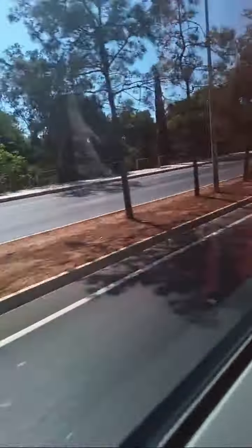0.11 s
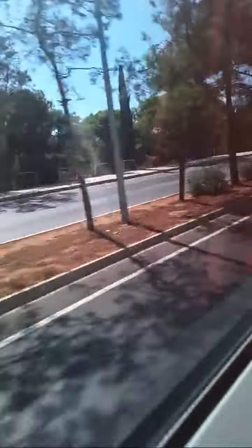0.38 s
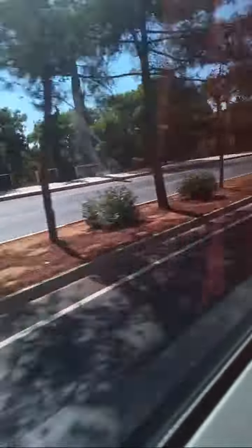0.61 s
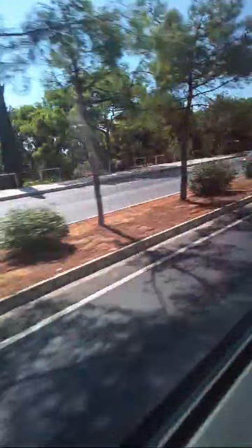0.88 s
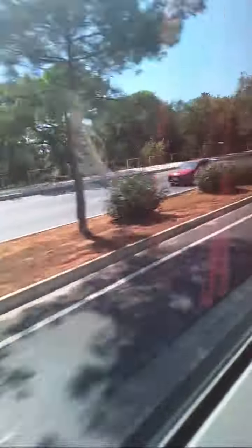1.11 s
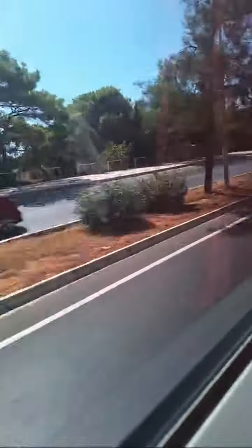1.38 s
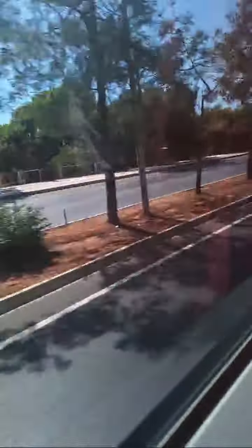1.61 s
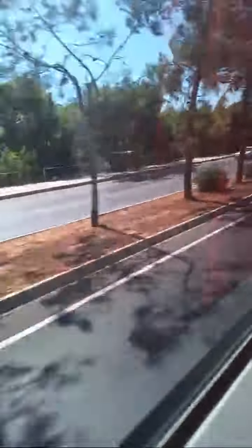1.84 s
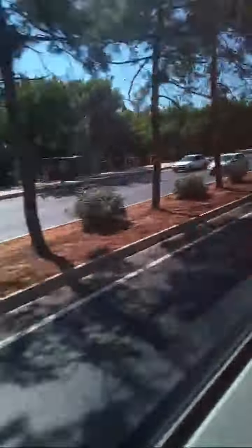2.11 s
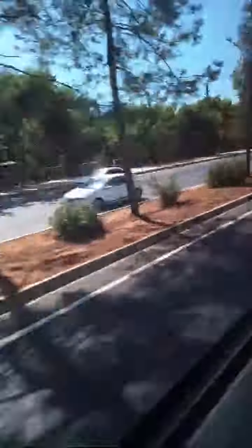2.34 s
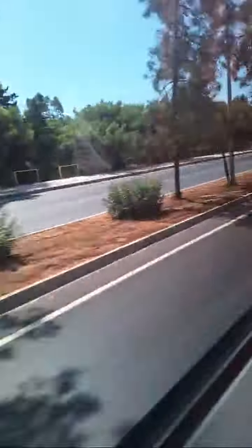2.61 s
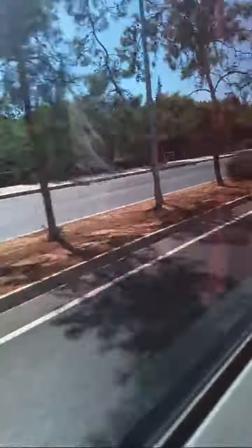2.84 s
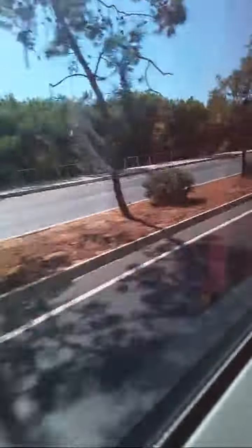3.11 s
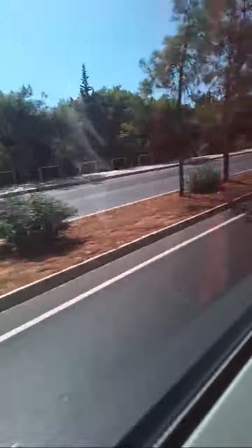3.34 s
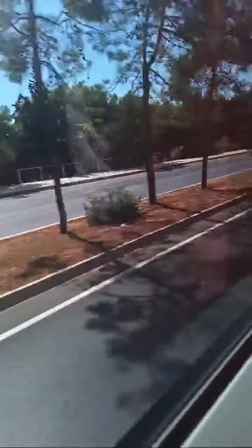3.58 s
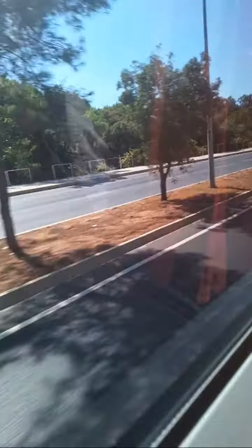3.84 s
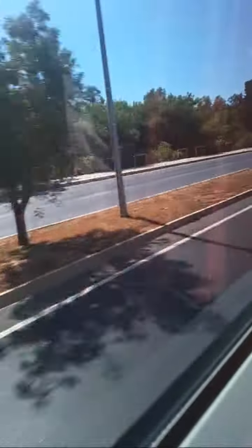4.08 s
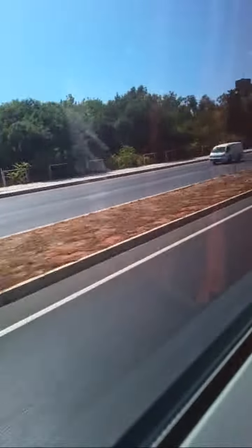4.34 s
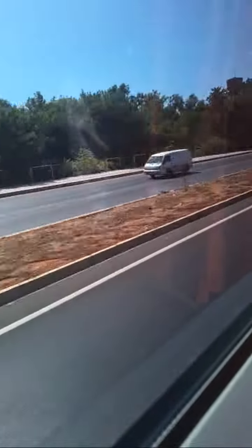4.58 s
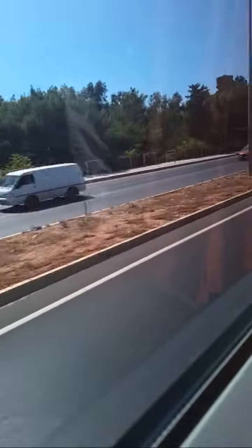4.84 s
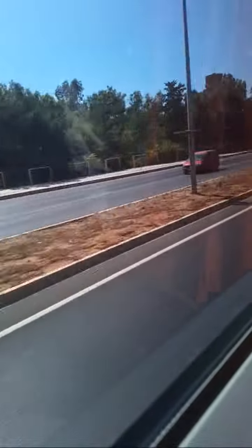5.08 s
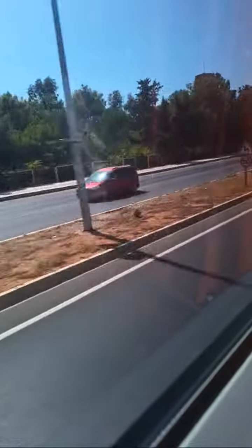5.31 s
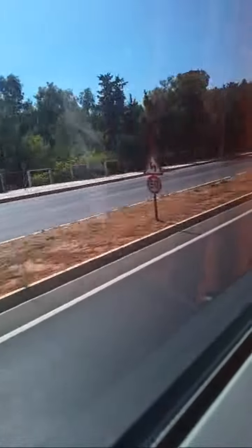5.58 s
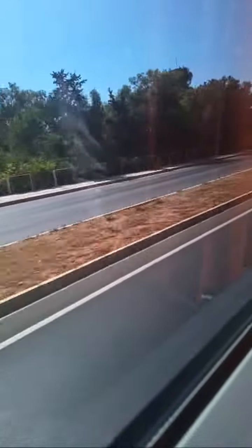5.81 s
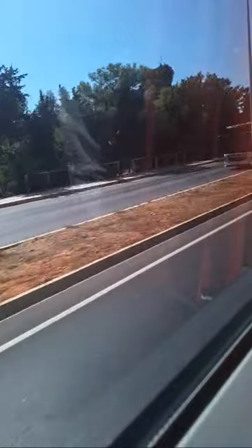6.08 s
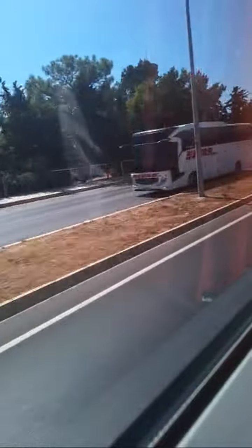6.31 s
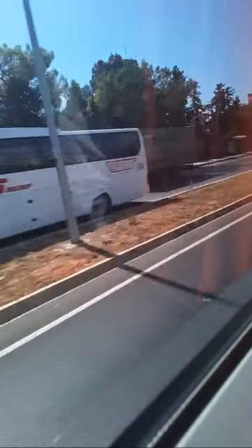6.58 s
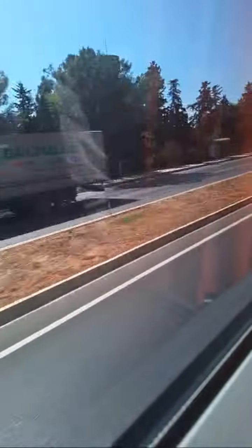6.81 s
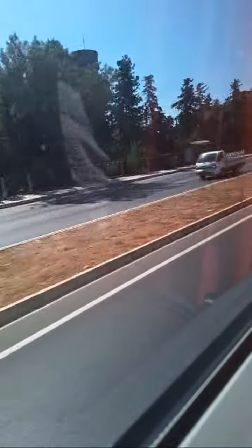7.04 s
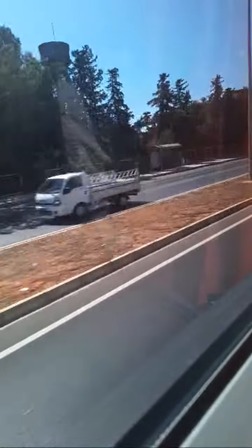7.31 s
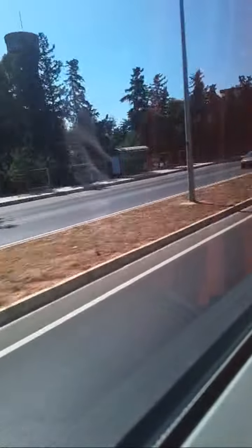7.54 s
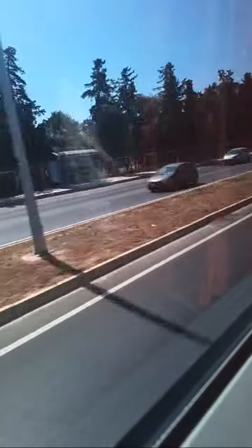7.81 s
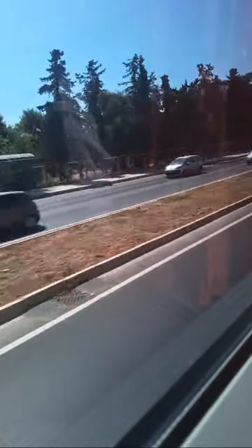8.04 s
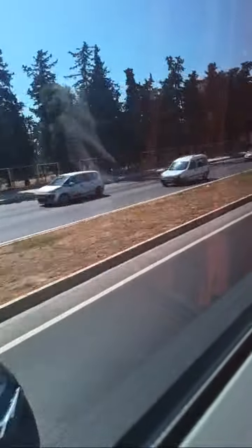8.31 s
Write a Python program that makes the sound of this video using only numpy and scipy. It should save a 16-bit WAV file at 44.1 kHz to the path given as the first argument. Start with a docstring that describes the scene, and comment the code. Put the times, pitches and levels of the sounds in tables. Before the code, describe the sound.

Throughout about 8.4 seconds, a coach cabin rumbles on a smooth road, heard by a phone near the window. Boomy floor and panel resonances dominate, with low engine and shaft hum that surges with load, muted tyre roar, faint air hiss, steady machinery tones and a slight gear whine. At 0.4 s fingers scuff the case, a bump sounds, and the rumble briefly stutters as a buzzing loop, then dips with a click at 0.5. Soft bumps follow around 1.2, 1.9, 2.3 with more scuffs, and a stronger one at 2.7. At 3.8 sound cuts out for an eighth of a second, returning thin and bright before the bass refills; a tiny gap and click come at 4.2. Bumps continue at 4.6, 5.4, 6.1 and 6.4. Short scuffs at 5.6 and 6.1. From 6 s tiny high trim squeaks chirp; faint seal hiss and fluttering whistle peak near 7.2, while a mid drone swells afterwards.

```python
"""Inside a coach on a smooth road, a phone by the window. Throughout, shaken body panels boom as resonant noise,
shaft and engine hum as harmonics, tyres, air and gears hiss and whine as coloured noise, bumps ring as sines.
At 0.4 s fingers scuff the case, a short stretch is looped, and the level dips with a click; more scuffs at 2.2 s.
At 3.8 s the sound drops out for 0.13 s and returns thin and bright; a tiny gap and a click follow at 4.2 s.
Scuffs return at 5.6 and 6.1 s; from 6 s the trim squeaks in gliding sines; crosswind at a seal peaks at 7.2 s."""
import sys
import numpy as np
from scipy import signal
from scipy.fft import rfft, irfft, next_fast_len
from scipy.io import wavfile
from scipy.ndimage import uniform_filter1d

SR = 44100
rng = np.random.default_rng(int(sys.argv[2]) if len(sys.argv) > 2 else 0)


def put_to_file(sound):
    """Save the sound as 16-bit audio at rate SR, in the file named by the first command-line argument."""
    columns = np.atleast_2d(sound).T  # one column per channel
    safe = np.clip(columns, -1, 1)
    whole_steps = np.round(safe * 32767)
    wavfile.write(sys.argv[1], SR, whole_steps.astype(np.int16))


def how_loud(loudness_db):
    """Turn decibels into a plain amplitude multiplier (0 dB gives 1, 20 dB gives 10)."""
    steps = np.asarray(loudness_db, float) / 20
    return 10 ** steps


N = 371322


def seconds():
    """Time of each sample."""
    return np.arange(N) / SR


def curves(tables):
    """Columns of (s, value, ..) rows, joined by straight lines, one value a sample."""
    s, *columns = np.concatenate(tables).T
    return [np.interp(seconds(), s, column) for column in columns]


def unit(x):
    """Scale to rms 1."""
    return x / np.sqrt(np.mean(x ** 2))


def noise(points):
    """Gaussian noise of rms 1 with a spectrum of (Hz, dB) points, straight over log frequency."""
    size = next_fast_len(N)
    hz, db = np.transpose(points)
    bin_hz = np.arange(size // 2 + 1) * SR / size + 1e-9
    gain = how_loud(np.interp(np.log(bin_hz), np.log(hz), db, -200, -200))
    return unit(irfft(rfft(rng.standard_normal(size)) * gain, size)[:N])


def even(x, span_s, share):
    """Take a share of the slow swing out of a noise."""
    k = int(span_s * SR)
    power = uniform_filter1d(uniform_filter1d(x ** 2, k), k)
    return unit(x / (power + .02) ** (share / 2))


def walk(rate_hz):
    """Standard normal draws held 1 / rate_hz, then slewed twice, which narrows their spread."""
    k = int(SR / rate_hz)
    held = np.repeat(rng.standard_normal(N // k + 1), k)[:N]
    return uniform_filter1d(uniform_filter1d(held, k), k)


def band(hz, width_hz):
    """Noise ringing in one resonance."""
    half_hz, skirt_hz = width_hz / 2, 3 * width_hz
    return noise([(hz - skirt_hz, -40), (hz - half_hz, -3), (hz, 0), (hz + half_hz, -3), (hz + skirt_hz, -40)])


# fingers shifting on the case, levels before the envelope:
# start_s, port_ring_db, upper_ring_db, airy_top_db, decay_s
SCUFFS = [(0.369, -62, -82, -67, 0.016), (.389, -70, -82, -78.5, .006), (2.162, -73, -72, -81, 0.016),
          (2.181, -64, -68, -73, 0.011), (5.551, -59, -71, -81, 0.0067), (6.055, -59, -90, -79, 0.0046)]
SCUFF_RISE_S = .0015


def scuffs():
    """Short dry scuffs, bright because they reach the microphone through the case."""
    top = noise([(4000, -14), (10000, 1.5), (15700, -1.0)])
    ring = even(band(9300, 800), .002, .7)
    upper = even(band(13200, 1100), .002, .7)
    out = np.zeros(N)
    for start_s, ring_db, upper_db, top_db, decay_s in SCUFFS:
        since_s = np.maximum(seconds() - start_s, 0)
        shape = (1 - np.exp(-since_s / SCUFF_RISE_S)) * np.exp(-since_s / decay_s)
        out += shape * (how_loud(ring_db) * ring + how_loud(upper_db) * upper + how_loud(top_db) * top)
    return out


# squeaks of the trim: start_s, level_db, pitch_hz, glide_hz, length_s
SQUEAKS = [(6.04, -69, 3960, -2, 0.046), (6.138, -73, 3750, 0, .04), (6.3849, -66, 3780, 50, 0.05),
           (6.6, -71, 3850, 0, .08), (6.77, -68, 3820, 0, 0.045), (7.125, -61, 4000, 120, 0.075),
           (7.318, -67, 3880, 150, 0.035), (7.465, -71, 3800, 37, .04), (7.545, -67, 3950, -220, 0.04),
           (7.81, -64, 4320, -420, 0.06), (8.04, -65.5, 3850, 500, 0.049), (8.15, -70, 3800, 19, 0.05)]
SQUEAK_WOBBLE_HZ, SQUEAK_RAGGED_DB = 90, 2.5  # scales of the walks


def squeaks():
    """Rubbing trim: thin sines that glide, wobble in pitch and are ragged in level."""
    out = np.zeros(N)
    wobble_hz = SQUEAK_WOBBLE_HZ * walk(220)
    ragged = how_loud(SQUEAK_RAGGED_DB * walk(150))
    for start_s, level_db, pitch_hz, glide_hz, length_s in SQUEAKS:
        along = np.clip((seconds() - start_s) / length_s, 0, 1)
        phase = 2 * np.pi * np.cumsum(pitch_hz + glide_hz * along + wobble_hz) / SR
        out += np.sqrt(2) * how_loud(level_db) * np.sin(np.pi * along) * ragged * np.sin(phase)
    return out


# crosswind pressing on the window seal: peak_s, half_width_s, rise_db
CROSSWIND = (7.2, 1.5, 5)
SEAL_DB = -73


def window_seal():
    """Air hisses at the seal; a thin wandering whistle flutters and swells more steeply with the wind."""
    peak_s, half_width_s, rise_db = CROSSWIND
    wind_db = rise_db * np.exp(-((seconds() - peak_s) / half_width_s) ** 2)
    leak = how_loud(SEAL_DB + wind_db + 2.9 * walk(30)) * band(4000, 640)
    pitch_hz = 3900 + 110 * walk(14) + 90 * walk(200)
    whistle = np.sin(2 * np.pi * np.cumsum(pitch_hz) / SR)
    return leak + how_loud(SEAL_DB - 8 + 1.5 * wind_db + 3 * walk(30)) * whistle


# colour of the air rushing past: freq_hz, level_db
AIR = [(900, -28.5), (1100, -2.5), (1470, -1), (1750, -5), (2120, -5), (2610, -10.5), (3400, -14),
       (4300, -16), (5200, -20.5), (7950, -30), (8100, -26.5), (8800, -20), (10000, -25), (10200, -34),
       (15700, -39)]
HISS_DB = -57


def air_hiss():
    """Air rushing past the glass: coloured noise, wavering in level."""
    return how_loud(HISS_DB + 0.76 * walk(18) + 0.84 * walk(12)) * noise(AIR)


# fans, pumps and gear case: freq_hz, width_hz, level_db
WHINE = [(486, 2, -64), (690, 40, -65), (798, 16, -60), (1032, 6, -65), (2100, 240, -64.5)]


def whine():
    """Steady-pitched machinery tones: narrow noises, each wavering in level."""
    return sum(how_loud(db + 1.3 * walk(18)) * band(hz, width_hz) for hz, width_hz, db in WHINE)


# swells of a narrow drone: time_s, level_db
DRONE = [
    [(0, -55), (.4, -66), (.7, -60.5), (3.8, -62), (5.4, -72.5), (6, -64), (6.3, -74), (7.2, -74),
     (7.35, -57.5), (7.7, -56.5), (8.15, -56), (8.25, -66), (8.42, -64)],
]


def drone():
    """A resonance at 702 Hz, 10 Hz wide, that swells now and then."""
    return how_loud(curves(DRONE)[0]) * even(band(702, 10), .05, .6)


# gear mesh: freq_hz, width_hz, relative_db
MESH = [(2066, 8, -2), (2130, 18, -4), (2190, 30, -10)]


def gear_mesh(mesh_db):
    """Meshing teeth whine in narrow noises that follow the load together."""
    teeth = sum(how_loud(db) * even(band(hz, width_hz), .05, .5) for hz, width_hz, db in MESH)
    return how_loud(mesh_db + 1.8 * walk(14) - 1) * teeth


# colour of the tyre roar: freq_hz, level_db
TYRES = [(205, -25), (232, 0), (268, -1), (285, -5), (300, -7.5), (380, -8), (460, -14.5), (500, -15),
         (664, -17), (783, -18), (957, -21.5), (1150, -28), (1500, -50)]
ROAR_DB = -39


def lowpass(x, order, hz):
    """Zero-phase low-pass."""
    return signal.sosfiltfilt(signal.butter(order, hz, fs=SR, output="sos"), x)


def tyre_roar(jolt_db):
    """Tyre noise whose low, middle and high parts surge apart, with a share of the jolts."""
    tyres = noise(TYRES)
    low, upto_mid = lowpass(tyres, 2, 330), lowpass(tyres, 2, 600)
    parts = (low, upto_mid - low, tyres - upto_mid)
    surging = sum(how_loud(1.6 * walk(28) + .5 * walk(11)) * part for part in parts)
    return how_loud(ROAR_DB + 0.53 * jolt_db) * surging


def hum(turn_hz, level_db, orders):
    """Multiples of one turning rate; each wavers in level and phase on its own, as the mountings move."""
    phase = 2 * np.pi * turn_hz * seconds()
    tones = np.zeros(N)
    for multiple, order_db in orders:
        wavering = multiple * phase + .7 * walk(7) + 6 * rng.random()
        tones += how_loud(order_db + 1.8 * walk(11)) * np.sin(wavering)
    return np.sqrt(2) * how_loud(level_db) * tones


# engine: multiple of the firing rate, relative_db
ENGINE_ORDERS = [(1, -13.5), (2, -1.5), (3, -4), (4, -12.5)]


def engine():
    """Harmonics of the firing rate at a steady overall level."""
    return hum(67.76, -38.5, ENGINE_ORDERS)


# drive shaft: multiple of the turning rate, relative_db
SHAFT_ORDERS = [(2, -5.5), (3, -.5), (4, -7.5), (6, -16)]


def drive_shaft(shaft_db):
    """Harmonics of the turning rate, as loud as the load makes them."""
    return hum(31.53, shaft_db, SHAFT_ORDERS)


# load on the drive line: time_s, shaft_db, mesh_db (before gear_mesh takes off 1 dB)
LOAD = [
    [(0, -27, -69), (.09, -31, -61), (.16, -41, -64), (.4, -29.5, -60), (.6, -33.5, -66), (.72, -27.5, -61),
     (.95, -30.5, -66.5), (1.3, -28.5, -61), (1.5, -36, -70), (1.92, -31, -75), (2.08, -39.5, -70),
     (2.27, -30.5, -72), (2.49, -35, -74), (2.62, -30.5, -62.5), (3.28, -29.5, -74.5), (3.45, -37, -68),
     (3.52, -29.5, -64), (3.98, -28, -69.5), (4.48, -39, -67), (4.71, -27.5, -68), (4.81, -38, -67),
     (5.07, -26.5, -80), (5.35, -35.5, -66), (5.51, -25.5, -70), (5.63, -35, -72), (6.85, -26.5, -70),
     (7.01, -32, -79), (7.11, -30.5, -63), (7.34, -32.5, -69), (8.28, -34, -67), (8.42, -30, -62)],
]


def drive_line():
    """One load drives both the shaft hum and the gear whine; returns the two apart."""
    shaft_db, mesh_db = curves(LOAD)
    return drive_shaft(shaft_db), gear_mesh(mesh_db)


# bumps, each in one ring of the body: peak_s, level_db, pitch_hz
BUMPS = [(.412, -28.5, 105), (1.17, -33, 72), (1.85, -29.5, 75), (2.25, -25, 72), (2.69, -22.5, 200),
         (3.75, -26.5, 78), (4.35, -38, 195), (4.61, -26, 65), (5.359, -25, 190), (5.719, -28, 185),
         (6.07, -26, 195), (6.36, -23, 128), (7.15, -28.5, 195), (8.28, -37, 78)]
BUMP_RISE_S, BUMP_RING_S = 0.035, .03


def bumps():
    """Each bump swells in one ring of the body and dies away."""
    out = np.zeros(N)
    for peak_s, level_db, pitch_hz in BUMPS:
        since_s = seconds() - peak_s
        rise = np.exp(-(since_s / BUMP_RISE_S) ** 2)
        decay = np.exp(-np.abs(since_s) / BUMP_RING_S)
        tone = np.sin(2 * np.pi * (pitch_hz * seconds() + rng.random()))
        out += np.sqrt(2) * how_loud(level_db) * np.where(since_s < 0, rise, decay) * tone
    return out


# road under the wheels: time_s, shake_db, lean_db (toward long waves)
SHAKE = [
    [(0, -26.5, 3.5), (.7, -33, -5.5), (1.3, -27.5, -1), (2, -28.5, 0), (2.7, -28.5, -2.5), (3.3, -28.5, 0),
     (3.8, -30, 1.5), (4.6, -25.5, 1), (5.3, -29.5, 1), (5.9, -27.5, -0.5), (6.65, -28, 0.5),
     (7.25, -28.5, -1), (7.75, -31, -2.5), (8.1, -29.5, -1), (8.42, -28, 2)],
]
# colours of the three rings: freq_hz, level_db
FLOOR = [(28, -48.5), (45, -15.5), (60, -10.5), (72, 2), (85, 0), (100, -9.5), (112, -26.5)]
PANELS = [(95, -20.5), (105, -3), (125, -6), (138, -3), (143, -11), (152, -7.5), (162, -8.5), (172, -12),
          (185, -26.5)]
CABIN = [(150, -30), (165, -7), (185, -5), (200, 0), (212, -6), (226, -12), (245, -30)]
FLOOR_DB, PANELS_DB, CABIN_DB = -3.5, -4.5, -7.5  # share of the shake
THROB_DB, THROBS_PER_S = 1.34, 26


def body(jolt_db):
    """Road shake keeps floor, panels and cabin air ringing; damped mountings even out each ring."""
    shake_db, lean_db = curves(SHAKE)
    rings = ((FLOOR, FLOOR_DB + lean_db), (PANELS, PANELS_DB), (CABIN, CABIN_DB - lean_db))
    out = np.zeros(N)
    for colour, share_db in rings:
        # each ring swells and sinks on its own
        level_db = shake_db + jolt_db + share_db + THROB_DB * walk(THROBS_PER_S)
        out += how_loud(level_db) * even(noise(colour), 0.043, 0.84)
    return out


def scene():
    """Everything in the cabin, one channel; body rings, hums and (in part) tyre roar share the jolts."""
    jolt_db = 0.61 * walk(16)
    shaft, mesh = drive_line()
    background = scuffs() + squeaks() + window_seal() + air_hiss() + whine() + drone() + mesh
    hums = how_loud(jolt_db) * (engine() + shaft)
    return (background + tyre_roar(jolt_db) + hums + bumps() + body(jolt_db))[None]


def microphone(x):
    """The microphone loses the deep bass below 47 Hz."""
    return signal.sosfilt(signal.butter(3, 47, "high", fs=SR, output="sos"), x)


# a lost stretch: start_s, length_s, loop_s, fade_db
BRIDGE = (.418, .072, .0095, -5)


def bridge(x):
    """Loop the last cycle of the lows, fading; the treble and a trace of the lows go on quieter."""
    start_s, length_s, loop_s, fade_db = BRIDGE
    start, size, t = int(start_s * SR), int(loop_s * SR), seconds()
    low = lowpass(x, 4, 1200)
    # blending with the cycle before closes the seam of the loop
    ramp = np.arange(size) / size
    cycle = low[start - size:start] * (1 - ramp) + low[start - 2 * size:start - size] * ramp
    # overtones are weakened, the mean removed
    overtone_db = -4 * (np.arange(size // 2 + 1) > 1)
    cycle = irfft(rfft(cycle) * how_loud(overtone_db), size) - cycle.mean()
    fade = how_loud(fade_db * np.clip((t - start_s) / length_s, 0, 1))
    looped = cycle[(np.arange(N) - start) % size] * fade
    inside = uniform_filter1d(1. * ((t > start_s) & (t < start_s + length_s)), size=150)
    return x * (1 - inside) + inside * (looped + how_loud(-4) * (x - low) + how_loud(-14) * low)


# a brief dip: centre_s, half_width_s, depth_db
SAG = (.522, .022, -6)


def sag(x):
    """The level dips and recovers, in straight lines of dB."""
    centre_s, half_width_s, depth_db = SAG
    return x * how_loud(depth_db * np.clip(1 - np.abs(seconds() - centre_s) / half_width_s, 0, 1))


def restart(x, stop_s, length_s):
    """After a break the bass grows back from nothing while the rest starts 7 dB up and settles."""
    t = seconds()
    since_s = np.where(t > stop_s, np.maximum(t - (stop_s + length_s), 0), np.inf)
    bass = lowpass(x, 2, 300)
    return bass * (1 - np.exp(-since_s / 0.022)) + (x - bass) * how_loud(7 * np.exp(-since_s / 0.021))


# breaks, the long one first: stop_s, length_s, last_value, first_value (full scale 1)
BREAKS = [(3.8025, .1295, 0, 0), (4.1714, .004, .02, .025), (4.1954, 0, .068, -.076),
          (.5215, 0, .003, -.003)]


def breaks(x):
    """Silence each break and bend the wave to set values at its edges; a zero length only clicks."""
    t, n = seconds(), np.arange(N)
    x = restart(x, *BREAKS[0][:2])
    for stop_s, length_s, before, after in BREAKS:
        stop, start = int(stop_s * SR), int((stop_s + length_s) * SR)
        # the bend fades over 2 ms
        lead = (before - x[stop - 1]) * np.exp(-np.abs(t - stop_s) / .002) * (n < stop)
        tail = (after - x[start]) * np.exp(-np.abs(t - stop_s - length_s) / .002) * (n >= start)
        x = x + lead + tail
        x[stop:start] = 0
    return x


def low_pass(x):
    """Removes everything above the highest recorded frequency."""
    return signal.sosfilt(signal.butter(12, 15710, fs=SR, output="sos"), x)


def record(dry):
    """The phone's microphone, then its looped stretch, dip and breaks."""
    mix = breaks(sag(bridge(microphone(dry[0]))))
    return low_pass(mix[None])


dry = scene()
out = record(dry)
put_to_file(out)
```